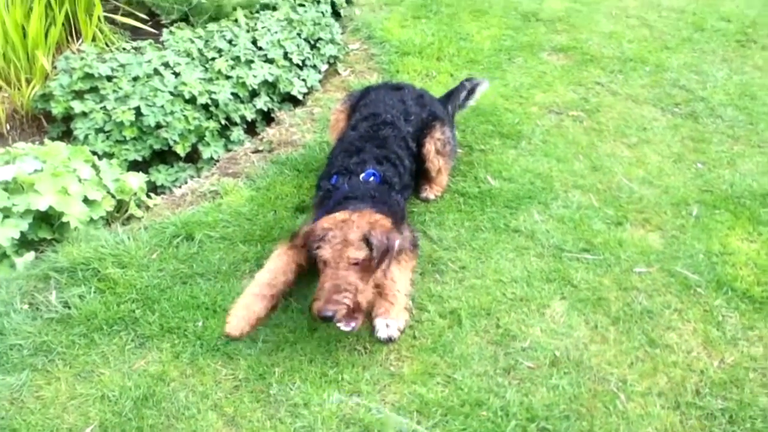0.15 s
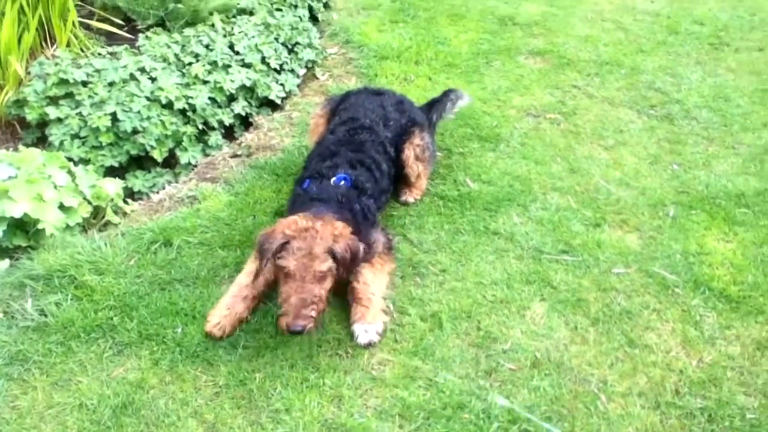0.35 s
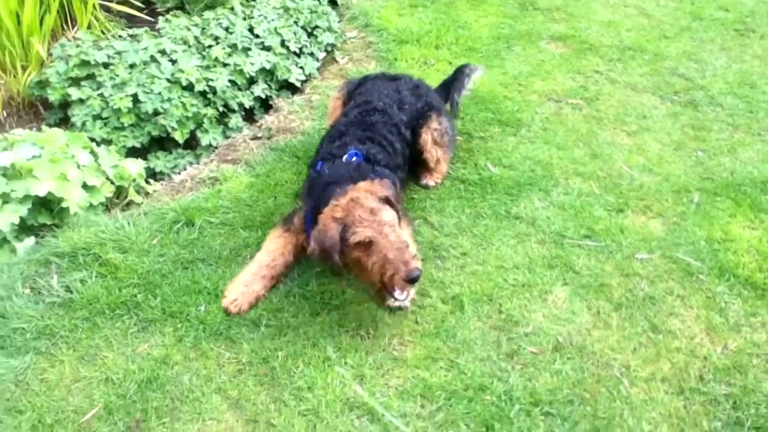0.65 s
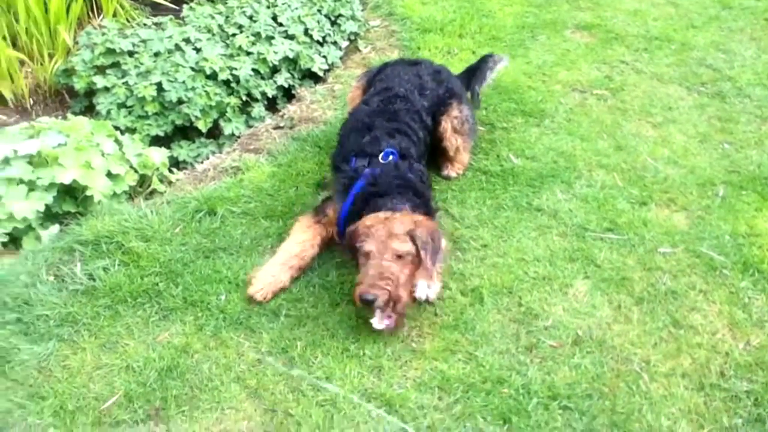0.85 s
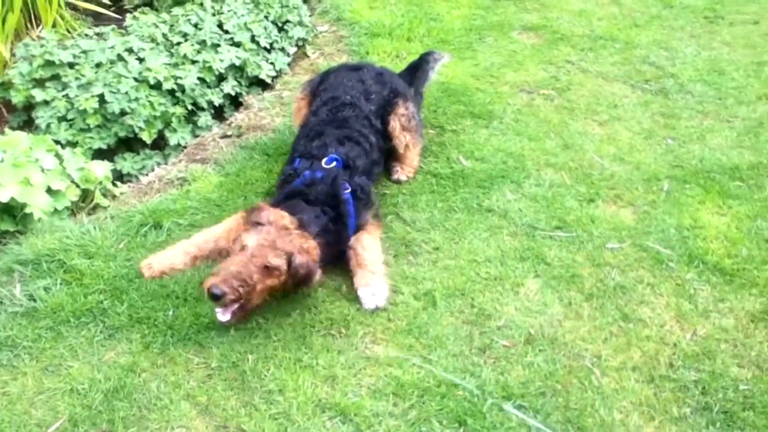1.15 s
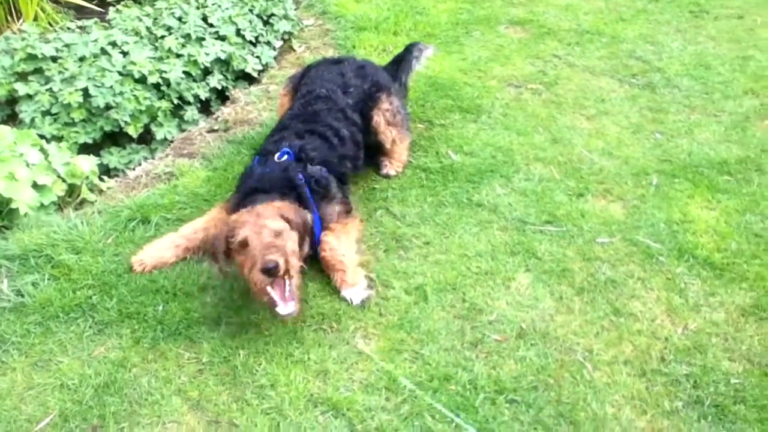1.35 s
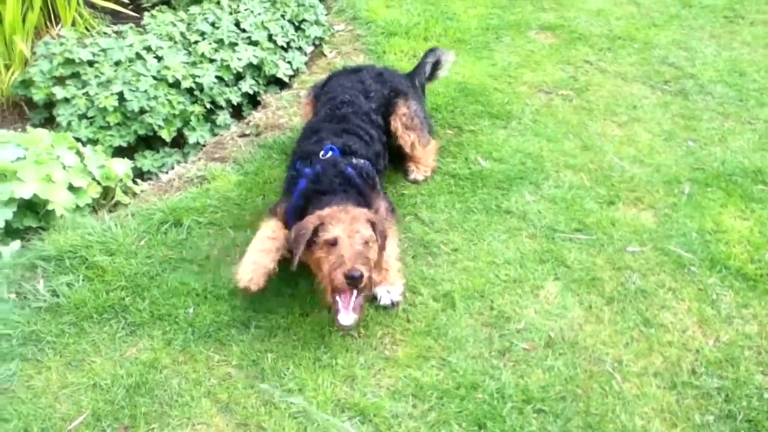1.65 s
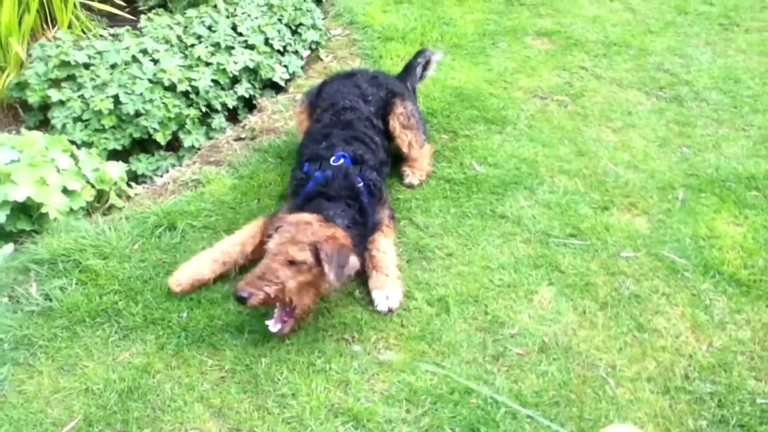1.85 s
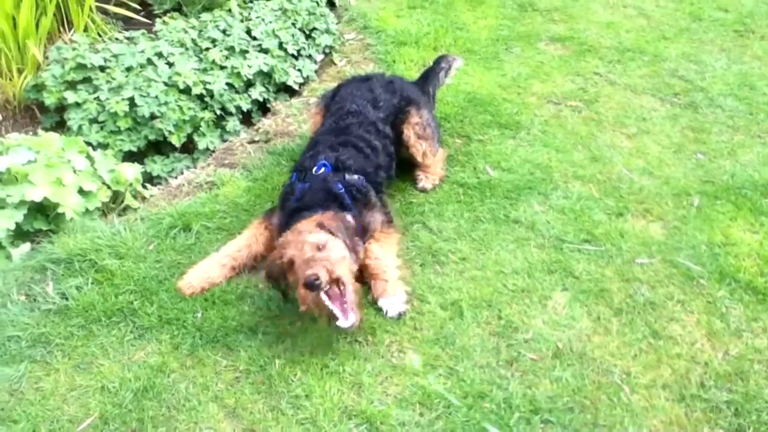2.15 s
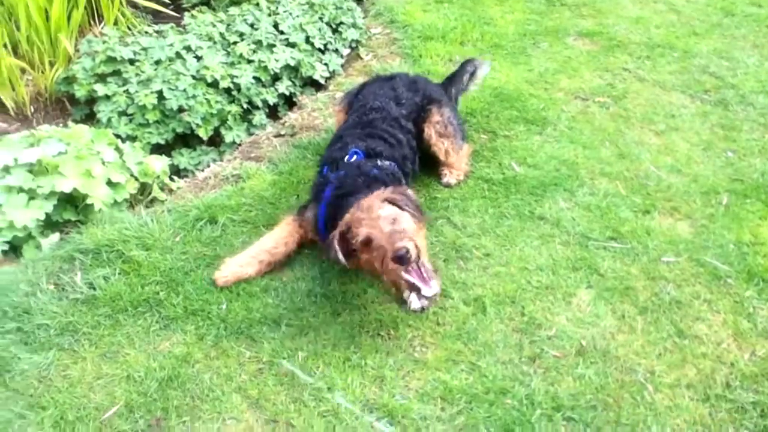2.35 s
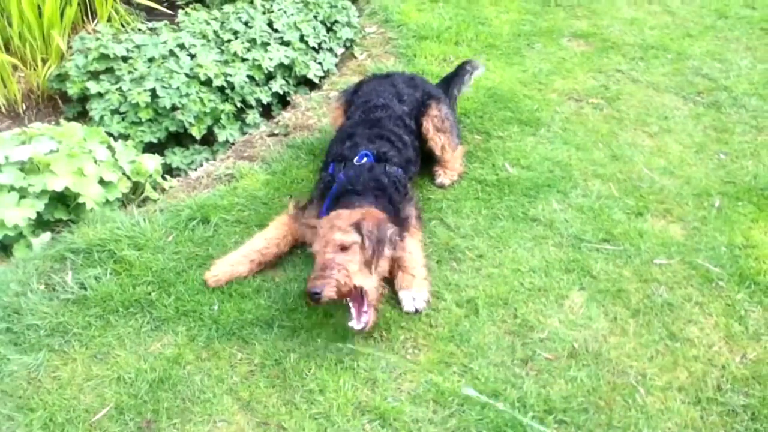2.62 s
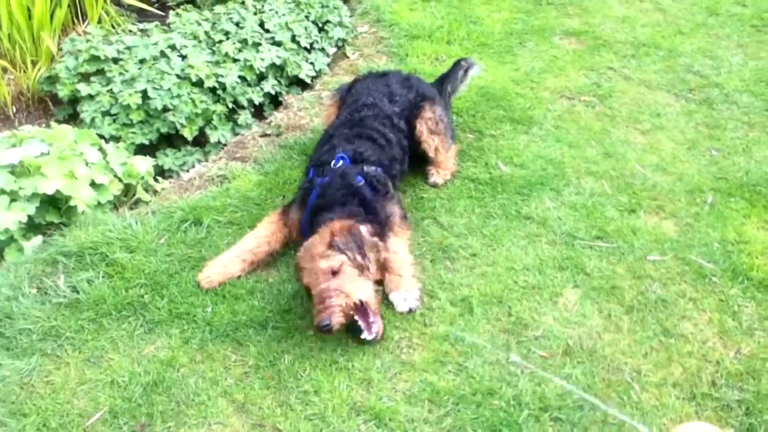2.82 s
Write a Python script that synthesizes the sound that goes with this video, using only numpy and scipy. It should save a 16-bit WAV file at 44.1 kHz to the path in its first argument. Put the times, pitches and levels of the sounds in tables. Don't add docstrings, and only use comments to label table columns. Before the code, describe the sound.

Close, dry buzzing chatter of a motorised water pistol runs throughout, its jet growing into patchy crackles and hiss, with a few dog tooth clacks and faint low garden rumble, picked up by a phone outdoors.

```python
import sys
import numpy as np
from scipy import signal
from scipy.fft import rfft, irfft
from scipy.io import wavfile
from scipy.ndimage import uniform_filter1d

SR = 44100
rng = np.random.default_rng(int(sys.argv[2]) if len(sys.argv) > 2 else 0)


def linear_from_db(decibels):
    return 10 ** (np.asarray(decibels, float) / 20)


def store_pcm(level_fs):
    pcm = np.round(np.clip(level_fs, -1, 1) * 32767).astype(np.int16)
    wavfile.write(sys.argv[1], SR, np.atleast_2d(pcm).T)


N = 131418

# start_s, slam_db, rebound_db, whine_db
PUSH_STROKES = [(0.0403, -7, -17.5, -22), (0.2094, -5.5, -17.5, -22.5), (0.383, -7, -25, -22),
                (0.5611, -6.0, -10, -18.5), (0.7412, -5, -18, -17.5), (0.9228, -2.5, -20, -18),
                (1.1034, -6.5, -13.5, -17), (1.2845, -6.5, -7.5, -16.5), (1.4671, -5.5, -17.5, -18),
                (1.6501, -5, -16.0, -18.5), (1.8347, -5.5, -10.5, -16.5), (2.0173, -5.5, -9.5, -17),
                (2.1994, -5.0, -14.5, -16.5), (2.3805, -4.0, -15.5, -14), (2.5631, -7, -10, -15.5),
                (2.7457, -5.5, -19.5, -17.5), (2.9287, -5.5, -14, -16)]
# start_s, slam_db, rebound_db, whine_db
PULL_STROKES = [(0.1236, -9, -27, -22), (0.2947, -10, -19, -21.5), (0.4708, -11, -19.5, -18.5),
                (0.6499, -10, -17, -18), (0.831, -8.5, -17, -16.5), (1.0121, -9.5, -12.5, -18.0),
                (1.1927, -9, -15, -17.5), (1.3743, -10.5, -27, -17.5), (1.5574, -9.5, -18, -17.5),
                (1.7409, -7.5, -18.5, -20), (1.925, -10.5, -17.0, -17.0), (2.1071, -8.5, -11.5, -17),
                (2.2882, -9.5, -20, -16.5), (2.4703, -7.5, -14.0, -15.5), (2.6529, -7.5, -14, -18),
                (2.836, -9.5, -24.5, -17.5)]
# pitch_hz, push_db, pull_db, t60_s, rebound_change_db
SHELL_MODES = [(316.6, -28.5, -14, 0.16, -4), (429, -23, -15, 0.042, -4), (601, -22, -13.5, 0.031, -9),
               (794, -17.5, -18.5, 0.045, -0.5), (978, -21, -20, 0.057, 3),
               (1202, -19.5, -17.5, 0.033, 2.5), (1878, -7, -3, 0.025, -10.5), (2080, -7.5, -5, 0.014, 6),
               (2587, 2.5, 5, .012, 3), (2800, 3.5, 3, 0.0065, 2.5), (3552, 6, 6, 0.0097, 3),
               (4000, 2.5, 5, 0.011, 4.5), (4630, -11, -7, 0.04, -8), (5150, -3, -14.5, 0.013, 6)]
# delay_s, level_db, rebound_share (0-1), softness_s
SLAM_CONTACTS = [
    (.0008, -0.5, 0.03, 0.000081),
    (.0021, -6.5, 0, 0.00068),
    (.0040, -15.5, 0.5, 0.00024),
    (.007, -10, 0.1, 0.000068),
    (.0136, -1.5, 1, 0.000083),
    (.0143, -2.5, 0.88, 0.000087),
    (.0185, -16, 1, 0.00014),
    (.024, -24, 1, 0.00014),
]
# time_s, pitch_hz
MESH_PITCH = [(0, 2880), (.1, 2850), (.18, 2777), (.26, 2678), (.35, 2600), (.44, 2573), (.53, 2539),
              (.7, 2497), (2.98, 2497)]
# stroke_share (0-1), speed_ratio, whine_db, lower_whine_db, rattle_db
STROKE_SHAPE = [
    (0, .97, -21, -22, -2),
    (.24, 1.2, -12, -25, -0.5),
    (.42, 1.02, -19, -22, -5),
    (.49, 1.0, -4.5, -18, -5),
    (.58, 1.025, -.5, -15, -5),
    (.71, .99, -4.5, -14, -6),
    (.8, .98, -17, -15, -7),
    (.9, .965, -19, -19, -8),
]
# freq_hz, level_db (per Hz)
RATTLE_TONE = [(200, -52), (311, -20), (1450, -16), (2300, -5.5), (3200, -10), (4500, -17), (7500, -26.5),
               (11000, -55)]
# mesh_multiple (ratio), level_db
GEAR_PARTIALS = [(.126, -11), (.25, -18), (.495, -14.5), (1.66, -10.5), (1.88, -10.5)]
# start_s, level_db, pitch_hz
EARLY_DROPS = [(0.0915, -21, 5950), (0.2835, -17, 5500), (0.3592, -15.5, 5330), (0.377, -16.5, 4330),
               (0.504, -19.5, 5500), (0.5116, -19, 6000), (0.5596, -14, 5754), (0.5721, -34, 6930),
               (0.6159, -16, 5540), (0.6437, -15, 6700), (0.6608, -20.5, 7100), (0.6778, -26, 5880),
               (0.7323, -24, 5000), (0.7359, -32, 4580), (0.7505, -21, 7800), (0.7754, -18, 5410),
               (0.8057, -18, 4684), (0.8093, -16, 5840), (0.8173, -15.5, 6540), (0.8344, -15, 4900),
               (0.8506, -15, 4500), (0.8585, -24, 5200), (0.875, -20, 4700), (0.8835, -16, 4700),
               (0.9142, -28, 5400), (0.9262, -17, 6710), (0.9278, -21, 5800), (0.9454, -29, 5040),
               (0.9732, -14, 5400), (0.9752, -11, 5350), (0.9968, -20, 5100), (1.0055, -23, 4500),
               (1.0204, -17, 5470), (1.0224, -26, 4700), (1.0575, -14, 6230), (1.1067, -16.5, 7900),
               (1.2499, -17, 4624), (1.2611, -15, 5500), (1.275, -20, 5370), (1.4382, -14, 5252),
               (1.4728, -18, 5604), (1.4992, -21.5, 5890), (1.6229, -18, 4730), (1.6501, -25, 4990),
               (1.678, -33, 4700), (1.7026, -19, 5080)]
# start_s, level_db, pitch_hz
LATE_DROPS = [(1.7154, -15, 5090), (1.7346, -13, 4860), (1.7855, -14, 5250), (1.8686, -14, 5350),
              (1.8703, -32, 5330), (1.8909, -16, 5700), (1.898, -17, 5900), (1.9078, -28, 5000),
              (1.991, -22, 5920), (1.993, -21, 6000), (1.9995, -22, 5190), (2.0131, -17, 5705),
              (2.0631, -26, 4465), (2.065, -22, 4500), (2.0826, -26, 4800), (2.0852, -24, 7700),
              (2.0996, -21.5, 6350), (2.1013, -23, 8300), (2.1084, -19, 4700), (2.1154, -23, 4540),
              (2.17, -20, 4704), (2.1768, -23, 6340), (2.1828, -14.5, 6270), (2.1849, -19, 4860),
              (2.2528, -22, 5723), (2.2553, -18.5, 6900), (2.2676, -23, 5800), (2.3079, -39, 5000),
              (2.354, -21, 4942), (2.3803, -21, 4995), (2.3903, -32, 7850), (2.4187, -18, 5500),
              (2.4213, -24, 4540), (2.4366, -17, 6790), (2.4509, -25, 5900), (2.4647, -23, 5400),
              (2.5659, -28, 5280), (2.5765, -25, 4480), (2.6438, -15, 5320), (2.6674, -25, 5120),
              (2.7503, -28, 4350), (2.8991, -20, 6280), (2.9276, -13, 5690), (2.9396, -17, 5900),
              (2.9607, -27, 5310), (2.9688, -16.5, 6460)]
# time_s, level_db
JET_BREAKUP = [(0.0, -68), (.5, -49), (0.85, -45.5), (1.3, -56), (1.7, -47.5), (2.05, -44), (2.55, -47.5),
               (2.98, -52)]
# start_s, level_db
JAW_CLACKS = [(.0012, -10), (.7312, -1.5), (1.6771, -4), (2.3074, -1.5)]
# freq_hz, level_db (per Hz)
GARDEN_TONE = [(25, -9), (55, 0), (100, 0), (200, -1.5), (300, 0.5), (600, -61)]

SLAM_DB, CRACK_DB, SCRAPE_DB, SCRAPE_S = -2.5, -5.5, -22, 0.0026
CONTACT_SCATTER_DB, CONTACT_JITTER_S, MODE_SCATTER_DB = 2., .0003, 1.1
PULL_REBOUND_LAG_S = 0.00079
BOUNCE_NODE_HZ, BOUNCE_NODE_WIDTH_HZ, BOUNCE_NODE_DB = 2600, 510, -11
WOBBLE, WHINE_FLUTTER_DB = .011, 3
LOWER_RATIO, LOWER_SWING, LOWER_FLUTTER_DB, LOWER_WOBBLE = .66, .5, 3.2, .022
START_DB, EARLY_LAG, EARLY_S = -12, 0.05, 0.27
GLIDE_HZ, GLIDE_FALL_HZ, GLIDE_DB = 703, 124.9, -24
RATTLE_DB, RATTLE_SHELL_DB, GRAIN_DB = -31.5, -32.5, 2
DROP_DB, DROP_RING_DB, DROP_T60_S, DROP_LAG_S = 12.5, -12, 0.0047, -.0001
SPRAY_PER_S, SPRAY_MID_DB, SPRAY_DB, SPRAY_SCATTER_DB = 53.2, -51, -18, 3
CLUMP_S, CLUMP_PER_S = .012, 60
ECHO_S, ECHO_DB, ECHO_HZ = .0045, -2, 6600
HISS_DB, SPLASH_DB, SPLASH_S = -14, -32, 0.0069
JAW_LOW_HZ, JAW_HIGH_HZ, JAW_DB, JAW_TAIL_DB, JAW_TAIL_S = 1500, 5500, 14, -30, 0.0067
GARDEN_DB, TAIL_DB, TAIL_T60_S = -50.5, -31, 0.26
SHELL_LOW_HZ, TOP_HZ = 268, 15900


def band(x, lo_hz, hi_hz):
    return signal.sosfilt(signal.butter(2, [lo_hz, hi_hz], "bandpass", fs=SR, output="sos"), x)


def ring(x, hz, t60_s):
    radius = np.exp(-np.log(1000) / (max(t60_s, .002) * SR))
    angle = 2 * np.pi * hz / SR
    return signal.lfilter([0, np.sin(angle)], [1, -2 * radius * np.cos(angle), radius ** 2], x)


def die_away(x, seconds):
    return signal.lfilter([1], [1, -np.exp(-1 / (seconds * SR))], x)


def unit(x):
    return x / np.sqrt(np.mean(x ** 2))


def colour(x, points):
    hz, db = np.array(points, float).T
    freq = np.maximum(np.arange(N // 2 + 1) * SR / N, 1)
    gain = linear_from_db(np.interp(np.log(freq), np.log(hz), db, left=-60, right=-85))
    return unit(irfft(rfft(x) * gain, N))


def walk(rate):
    hold = int(SR / rate)
    steps = np.repeat(rng.standard_normal(N // hold + 1), hold)
    return 1.155 * uniform_filter1d(uniform_filter1d(steps, hold), hold)[:N]


def clicks(times, sizes, soft_s):
    at = np.asarray(times) * SR
    idx = at.astype(int)[:, None] + np.arange(-40, 41)
    push = np.exp(-.5 * ((idx - at[:, None]) / max(soft_s * SR / 2, .6)) ** 2)
    push *= (sizes / push.sum(1))[:, None]
    return np.bincount(np.clip(idx, 0, N - 1).ravel(), push.ravel(), N)


def follow(points, t):
    return np.interp(t, *np.array(points).T)


def slams(strokes, side):
    start, slam_db, rebound_db, _ = np.array(strokes, float).T
    chance = rng.standard_normal((len(start), len(SLAM_CONTACTS), len(SHELL_MODES) + 2))
    trains = np.zeros((len(SHELL_MODES), N))
    hits = np.zeros(N)
    for c, (delay, db, rebound, soft) in enumerate(SLAM_CONTACTS):
        rebounding = c > 3
        at = start + delay + PULL_REBOUND_LAG_S * (side - 1) * rebounding
        at = at + CONTACT_JITTER_S * chance[:, c, -1] * (c % 4 > 0)
        size_db = db + slam_db + rebound * (rebound_db - slam_db)
        size = linear_from_db(size_db + CONTACT_SCATTER_DB * chance[:, c, -2] * (c % 4 > 1))
        hits += clicks(at, size, soft)
        for m, mode in enumerate(SHELL_MODES):
            node_db = BOUNCE_NODE_DB * np.exp(-((mode[0] - BOUNCE_NODE_HZ) / BOUNCE_NODE_WIDTH_HZ) ** 2)
            spot_db = mode[4] * rebounding + node_db * (c == 3)
            scatter_db = MODE_SCATTER_DB * chance[:, c, m] * (m > 0)
            trains[m] += clicks(at, size * linear_from_db(spot_db + scatter_db), soft)
    shell = np.zeros(N)
    for m, mode in enumerate(SHELL_MODES):
        shell += (-1) ** m * linear_from_db(mode[side]) * ring(trains[m], mode[0], mode[3])
    crack = die_away(hits, 0.0012) * band(rng.standard_normal(N), 4870, 7480)
    scrape = die_away(hits, SCRAPE_S) * band(rng.standard_normal(N), 640, 7100)
    return linear_from_db(SLAM_DB) * shell + linear_from_db(SCRAPE_DB) * scrape + linear_from_db(CRACK_DB) * crack


def gears(t):
    rows = np.array(sorted(list(PUSH_STROKES) + list(PULL_STROKES)), float)
    first = 2 * rows[0] - rows[1] + [0, 0, 0, START_DB]
    last = 2 * rows[-1] - rows[-2]
    rows = np.vstack([first, rows, last])
    count = np.interp(t, rows[:, 0], np.arange(len(rows)))
    share = (count - EARLY_LAG * np.exp(-t / EARLY_S)) % 1
    shape = np.array(STROKE_SHAPE, float).T
    curves = [uniform_filter1d(np.interp(share, shape[0], c, period=1), size=60) for c in shape[1:]]
    speed, main_db, lower_db, rattle_db = curves
    load_db = np.interp(count - .6, np.arange(len(rows)), rows[:, 3])

    mesh_hz = follow(MESH_PITCH, t)
    phase = 2 * np.pi * np.cumsum(mesh_hz * speed * (1 + WOBBLE * walk(150))) / SR
    lower_speed = speed ** LOWER_SWING * (1 + LOWER_WOBBLE * walk(200))
    lower_phase = 2 * np.pi * LOWER_RATIO * np.cumsum(mesh_hz * lower_speed) / SR
    flutter_db = WHINE_FLUTTER_DB * (walk(200) + walk(1200)) / 1.93
    whine = linear_from_db(main_db + load_db + 2.0 + flutter_db) * np.sin(phase)
    lower = np.sin(lower_phase) + linear_from_db(-10.5) * np.sin(lower_phase / 2)
    lower = lower * linear_from_db(lower_db + load_db - 1.5 + LOWER_FLUTTER_DB * walk(120))
    for multiple, db in GEAR_PARTIALS:
        level_db = db + lower_db + load_db + LOWER_FLUTTER_DB * walk(60 + 90 * multiple)
        lower = lower + linear_from_db(level_db) * np.sin(multiple * lower_phase / LOWER_RATIO)

    pull = count % 2
    swell = np.sin(np.pi * np.clip((pull - .25) / 0.79, 0, 1))
    sigh = swell * np.sin(2 * np.pi * np.cumsum(GLIDE_HZ - GLIDE_FALL_HZ * (pull % 1)) / SR)
    glide = linear_from_db(GLIDE_DB + load_db) * sigh

    teeth = rng.standard_normal((2, N)) * linear_from_db(GRAIN_DB * walk(600) + rattle_db)
    shell = np.zeros(N)
    for hz, push_db, pull_db, t60_s, _ in SHELL_MODES:
        shell += linear_from_db(min(push_db, pull_db)) * unit(ring(teeth[1], hz, 1.16 * t60_s))
    rattle = linear_from_db(RATTLE_DB) * colour(teeth[0], RATTLE_TONE) + linear_from_db(RATTLE_SHELL_DB) * unit(shell)
    return whine + lower + glide + rattle


def drops(t):
    start, level_db, pitch_hz = np.array(list(EARLY_DROPS) + list(LATE_DROPS), float).T
    step = np.arange(0, t[-1], .002)
    chance = rng.random((len(step), 3))
    rate = SPRAY_PER_S * linear_from_db(follow(JET_BREAKUP, step) - SPRAY_MID_DB)
    since = step[:, None] - start
    clump = np.where(since > 0, np.exp(-np.abs(since) / CLUMP_S), 0).max(1)
    rate = rate + CLUMP_PER_S * clump
    odds = np.clip((rate * .002 - chance[:, 0]) * 50, 0, 1)
    small = odds * linear_from_db(SPRAY_DB - SPRAY_SCATTER_DB * np.log(chance[:, 1] + 0.13))
    snap = clicks(start + DROP_LAG_S, -linear_from_db(level_db + DROP_DB), .000045)
    snap = snap - clicks(step + 0.0025 * chance[:, 2], small, .00003)

    age = np.arange(400) / SR
    ring_db = level_db[:, None] + DROP_DB + DROP_RING_DB - 60 * age / DROP_T60_S
    rings = linear_from_db(ring_db) * np.sin(2 * np.pi * pitch_hz[:, None] * age)
    idx = (start[:, None] * SR).astype(int) + np.arange(len(age))
    direct = band(snap, 5700, 14600) + np.bincount(np.minimum(idx, N - 1).ravel(), rings.ravel(), N)
    lag = int(ECHO_S * SR)
    echo = np.r_[np.zeros(lag), band(direct, ECHO_HZ / 1.5, ECHO_HZ * 1.5)[:-lag]]

    hiss = unit(band(rng.standard_normal(N), 3900, 10800))
    splash = die_away(np.abs(snap), SPLASH_S)
    hiss_db = follow(JET_BREAKUP, t) + HISS_DB + 5.5 * walk(40.2)
    spray = (linear_from_db(hiss_db) + linear_from_db(SPLASH_DB) * splash) * linear_from_db(3.2 * walk(500)) * hiss
    return direct + linear_from_db(ECHO_DB) * echo + spray


def jaws():
    start, level_db = np.array(JAW_CLACKS, float).T
    hit = clicks(start, linear_from_db(level_db + JAW_DB), .00005)
    tail = die_away(hit, JAW_TAIL_S) * rng.standard_normal(N)
    return band(hit + linear_from_db(JAW_TAIL_DB) * tail, JAW_LOW_HZ, JAW_HIGH_HZ)


def open_air(near):
    k = np.arange(int(.2 * SR))
    tail = rng.standard_normal(len(k)) * np.exp(-np.log(1000) * k / (TAIL_T60_S * SR))
    tail = tail * (k > .002 * SR)
    return signal.fftconvolve(near, tail / np.sqrt(np.sum(tail ** 2)))[:N]


def garden():
    rise_db = np.interp(np.arange(N), [0, N], [-2.5, 1.5])
    return linear_from_db(GARDEN_DB + rise_db + 0.2 * walk(6.4)) * colour(rng.standard_normal(N), GARDEN_TONE)


def scene():
    t = np.arange(N) / SR
    near = slams(PUSH_STROKES, side=1) + slams(PULL_STROKES, side=2) + gears(t) + drops(t) + jaws()
    near = signal.sosfilt(signal.butter(4, SHELL_LOW_HZ, "highpass", fs=SR, output="sos"), near)
    return (near + linear_from_db(TAIL_DB) * open_air(near) + garden())[None]


def band_limit(x):
    return signal.sosfilt(signal.butter(12, 16810, fs=SR, output="sos"), x)


def record(dry):
    mix = signal.sosfilt(signal.ellip(8, .2, 60, TOP_HZ, fs=SR, output="sos"), dry)
    return band_limit(mix)


dry = scene()
out = record(dry)
store_pcm(out)
```